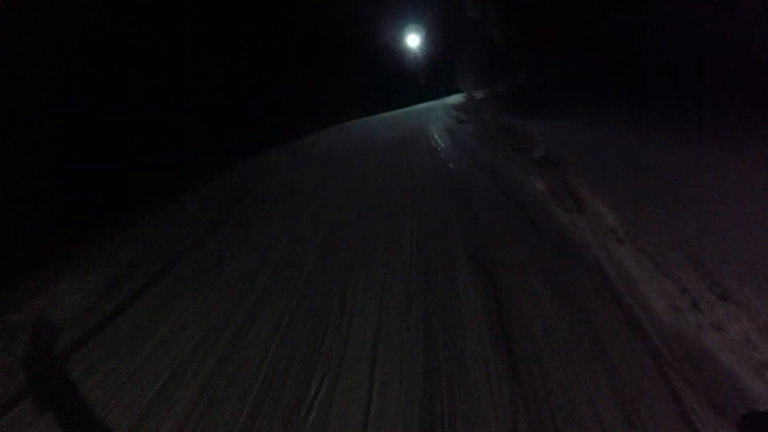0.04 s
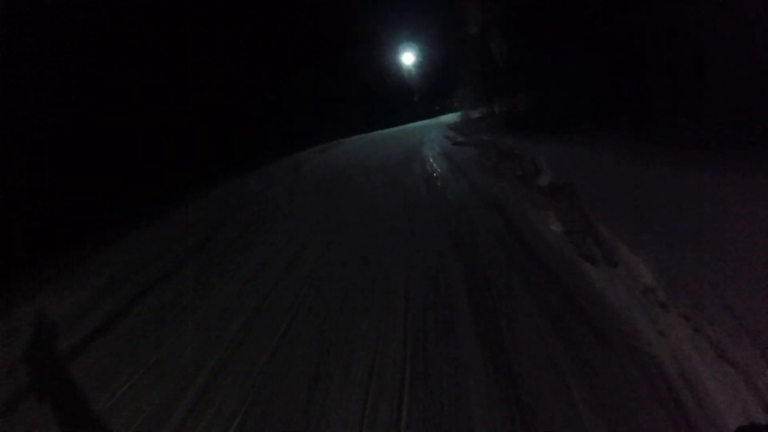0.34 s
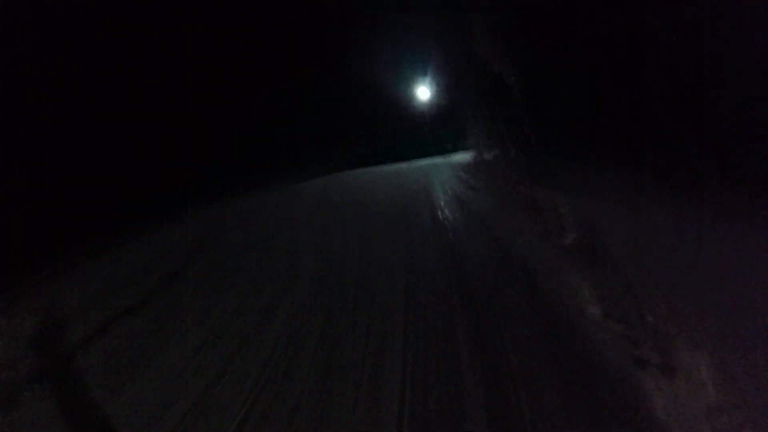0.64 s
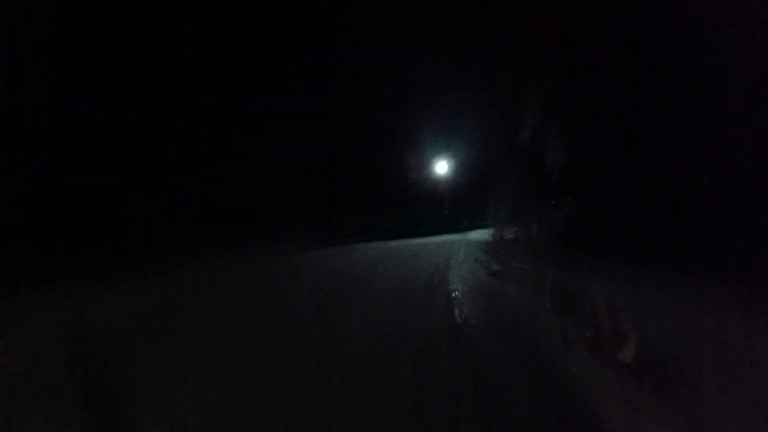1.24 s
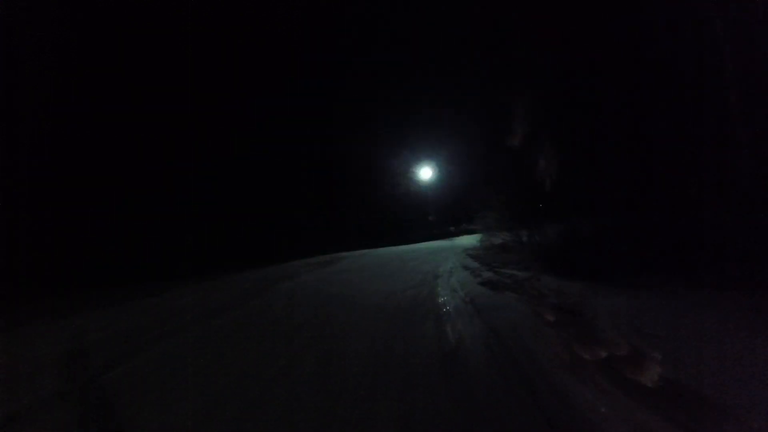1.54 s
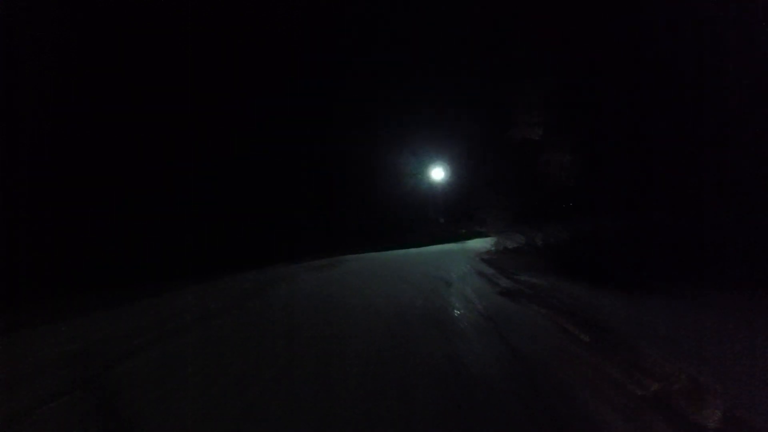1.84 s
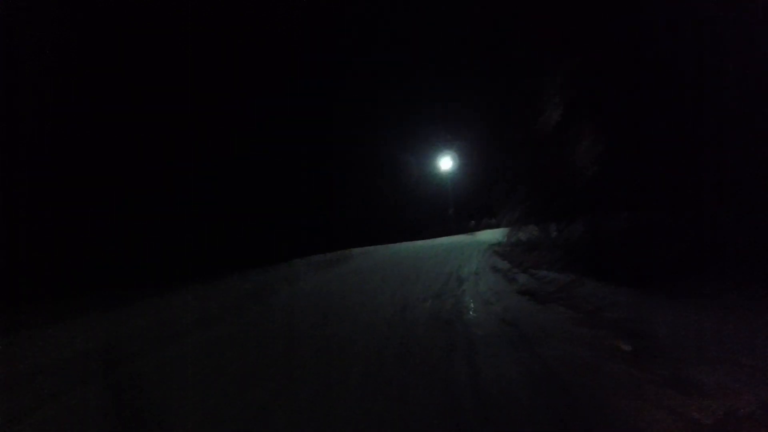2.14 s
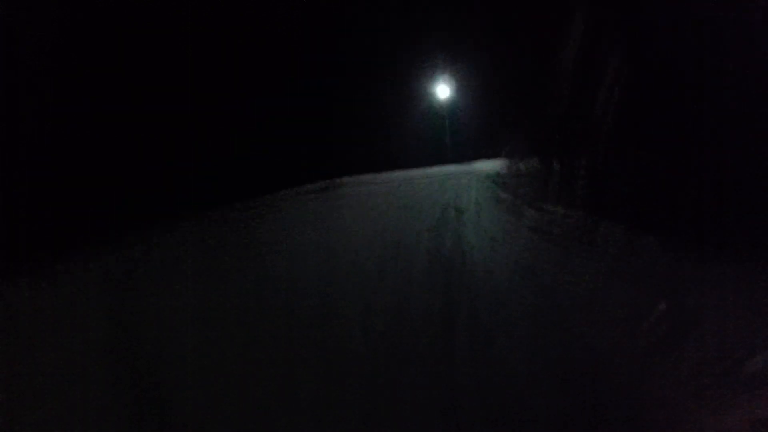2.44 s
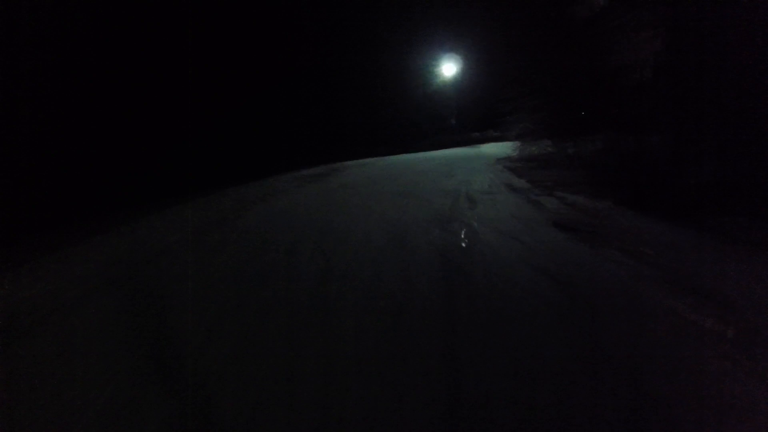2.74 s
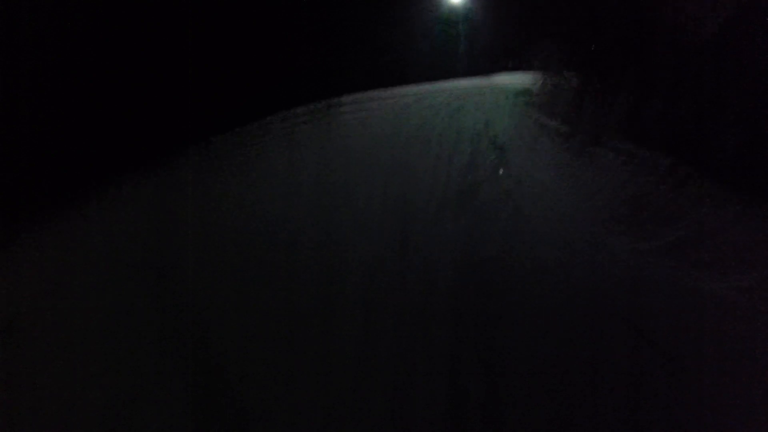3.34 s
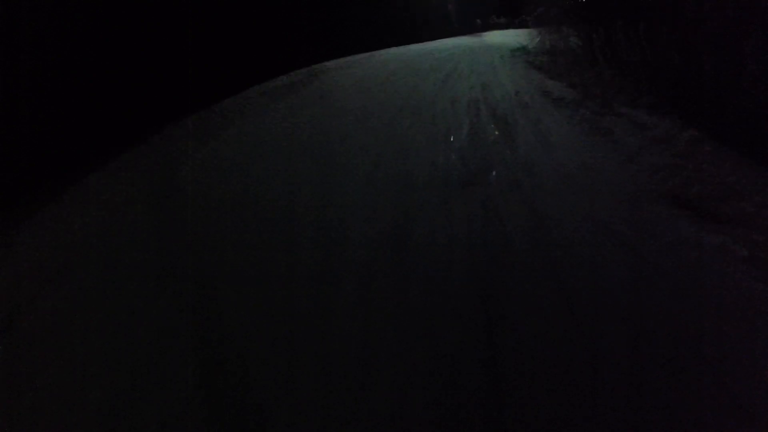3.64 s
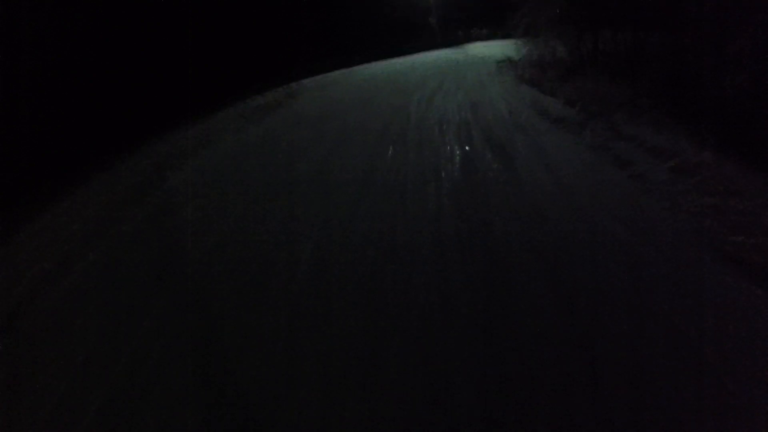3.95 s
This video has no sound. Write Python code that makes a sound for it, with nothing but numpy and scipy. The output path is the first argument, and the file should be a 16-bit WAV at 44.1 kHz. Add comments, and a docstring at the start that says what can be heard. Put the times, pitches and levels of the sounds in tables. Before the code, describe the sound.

Rasping rub against the microphone ends with a bump, leaving soft ski hiss and rumble.

```python
"""On a groomed ski slope at night, heard from inside the housing of a camera worn by a skier.
Something, probably a glove, scrapes the housing by stick-slip friction, lifts off and knocks the mount
into free vibration. Then the skis glide with a faint hiss and light edge scuffs as snow crystals
excite their resonances, while bumps shake the mount and make the housing rub and tick."""
import sys
import numpy as np
from scipy.fft import rfft, irfft, next_fast_len
from scipy.io import wavfile
from scipy.ndimage import map_coordinates

SR = 44100
rng = np.random.default_rng(int(sys.argv[2]) if len(sys.argv) > 2 else 0)


def wrap_up_sound(samples):
    """Save the sound to the file named by the first command line argument, as 16-bit audio."""
    columns = np.atleast_2d(samples).T
    # keep every value between -1 and 1, then stretch to whole-number steps
    tamed = np.clip(columns, -1, 1)
    steps = np.round(tamed * 32767).astype(np.int16)
    wavfile.write(sys.argv[1], SR, steps)


N = 176400

CRYSTALS_PER_S, CRYSTAL_SPREAD_DB = 2500, 4.5
# excitation spectrum of a soft contact: frequency_hz, level_db
SOFT_CONTACT = [(700, 1), (1400, 4.5), (6000, -2.5), (12000, -19)]


def amp(db):
    """Amplitude ratio of a level in decibels."""
    return 10 ** (np.asarray(db) / 20)


def unit(x):
    """Normalisation to rms 1."""
    return x / np.sqrt(np.mean(x ** 2) + 1e-20)


def clock():
    """The time of each sample in seconds."""
    return np.arange(N) / SR


def curves(rows):
    """Linear interpolation in time: one curve for each column after the first."""
    times, *columns = np.transpose(rows)
    return [np.interp(clock(), times, column) for column in columns]


def wobble(knots_per_s):
    """Smooth random modulation: a spline through Gaussian values."""
    return map_coordinates(rng.standard_normal(N // 20), [clock() * knots_per_s], mode="wrap")


def impulse(time_s):
    """A unit impulse, the ideal brief blow."""
    return (np.arange(N) == round(time_s * SR)) * 1.0


def slips(per_s, spread_db):
    """Friction as shot noise: random impulses of log-normal size, at rms 1."""
    signed_impulses = (rng.random(N) < per_s / SR) * np.sign(rng.standard_normal(N))
    return unit(signed_impulses * amp(spread_db * rng.standard_normal(N)))


def filtered(x, response):
    """Linear filtering: the spectrum of x times a frequency response."""
    size = next_fast_len(N + SR // 2)
    return irfft(rfft(x, size) * response(np.fft.rfftfreq(size, 1 / SR)), size)[:N]


def gain_at(f, points):
    """Gain at f, interpolated between (Hz, dB) points on a log frequency axis."""
    hz, db = np.transpose(points)
    return amp(np.interp(np.log(f + 1), np.log(hz + 1), db))


def coloured(x, points):
    """Zero-phase spectral shaping by (Hz, dB) points, at rms 1."""
    return unit(filtered(x, lambda f: gain_at(f, points)))


def resonate(x, modes):
    """Modal superposition: x drives damped resonators in parallel, at rms 1."""
    def response(f):
        return sum(amp(db) * 1j * f * width / (hz * hz - f * f + 1j * f * width)
                   for hz, width, db in modes)
    return unit(filtered(x, response))


def struck(x, points):
    """Minimum-phase response to x of a body given by (Hz, dB) points, at peak 1."""
    size = 2 * next_fast_len(N // 2 + SR // 4)
    cepstrum = irfft(np.log(gain_at(np.fft.rfftfreq(size, 1 / SR), points)), size)
    cepstrum[1:size // 2] *= 2  # folding onto positive time makes the response causal
    cepstrum[size // 2 + 1:] = 0
    ring = irfft(rfft(x, size) * np.exp(rfft(cepstrum)), size)[:N]
    return ring / np.abs(ring).max()


def scrape():
    """Stick-slip friction excites the housing; the contact grows lighter and thinner, then lifts off."""
    # band envelopes before trim: time_s, ring_db, rasp_db, treble_db
    band_levels = [(0.0, -32, -32, -46), (0.032, -41, -52, -60.5), (0.08, -43, -45, -57.5),
                   (0.12, -34, -38.5, -47.5), (0.14, -35, -38, -48.5), (0.2, -35.5, -38, -47.5),
                   (0.25, -43, -46.5, -57.5), (0.3, -34.5, -42, -52.5), (0.334, -37, -40.5, -51.5),
                   (0.378, -43.5, -49, -49), (0.412, -50, -54.5, -58.5), (0.45, -42.5, -54, -51.5),
                   (0.478, -46, -52, -52.5), (0.53, -40.5, -44, -46), (0.572, -43.5, -43.5, -49)]
    # spectrum under firm contact: frequency_hz, level_db
    firm_spectrum = [(150, -14), (400, -25.5), (650, -28.5), (1100, -23.5), (1550, -11.5), (1870, -9.5),
                     (2080, 4.5), (2260, -7.5), (2420, -0.5), (2650, -4.5), (2900, -16.5), (3130, -9.5),
                     (3430, -12.5), (3750, -9.5), (4030, -7.5), (4280, -22), (4750, -19.5), (5350, -29.5),
                     (5900, -20), (6400, -14), (6850, -20), (7250, -23), (7700, -24.5), (8500, -32),
                     (9100, -41), (10500, -37), (11000, -42), (11550, -35.5), (12400, -42), (15000, -46)]
    # spectrum under light contact: frequency_hz, level_db
    light_spectrum = [(150, -10.5), (750, -29), (1200, -21.5), (1600, -10.5), (1850, -13.5), (2100, -1),
                      (2470, -2), (2750, -5), (2930, -14), (3150, -5), (3450, -12.5), (3950, -3),
                      (4350, -15.5), (4750, -12), (5300, -25), (5900, -9.5), (6400, -1.5), (6800, -10.5),
                      (7200, -17), (7650, -13), (8100, -21), (8500, -17.5), (9100, -31), (10900, -32.5),
                      (11700, -25), (12500, -33), (15000, -35)]
    # ring, rasp and treble: low_hz, high_hz, trim_db
    bands = [(0, 2900, 0.7), (2900, 5400, 1), (5400, SR, -0.4)]
    ease_s, ease_fade_s, lift_s, lift_fade_s = 0.368, 0.04, 0.579, 0.01
    t, out = clock(), np.zeros(N)
    friction = slips(per_s=8000, spread_db=1.8) * amp(0.5 * wobble(knots_per_s=160))  # with judder
    firm, light = coloured(friction, firm_spectrum), coloured(friction, light_spectrum)
    eased = np.clip((t - ease_s) / ease_fade_s + .5, 0, 1)
    for level_db, (low_hz, high_hz, trim_db) in zip(curves(band_levels), bands):
        band = lambda x: unit(filtered(x, lambda f: (f >= low_hz) & (f < high_hz)))
        out += amp(level_db + trim_db) * ((1 - eased) * band(firm) + eased * band(light))
    touching = np.clip((lift_s - t) / lift_fade_s + .5, 0, 1)
    return out * touching


def knock():
    """Impulse response: one blow clicks on the housing, then the mount gives and its low modes ring."""
    # housing response to hard contact: frequency_hz, gain_db
    click_response = [(300, -14), (1100, -21), (1290, 0), (1440, -14), (1570, 4.5), (1750, -5), (2000, 3.5),
                      (2300, 2.5), (2780, -19), (3050, -0.5), (3650, -21), (4700, -20), (15000, -54)]
    # mount response: frequency_hz, gain_db
    mount_response = [(15, -34), (55, -16), (73, 4), (100, -5.5), (130, -0.5), (160, 0.5), (187, -14.5),
                      (230, -12.5), (290, -4.5), (330, -9), (390, -30.5), (470, -44), (600, -27.5),
                      (740, -44), (1200, -52), (4000, -100)]
    click = amp(-25) * struck(impulse(time_s=0.6653), click_response)
    thump = amp(-16.5) * struck(impulse(time_s=0.667), mount_response)
    return click - thump


def rubs():
    """Resonance under friction: soft swells of rubbing ring the housing and make the mount groan."""
    # housing modes: frequency_hz, bandwidth_hz, gain_db
    housing_modes = [(1580, 72, 13), (2137, 200, 15.5), (2370, 92, 11), (3100, 180, -28), (4700, 300, -32),
                     (6200, 600, -36)]
    # creaking mode of the mount: frequency_hz, bandwidth_hz, gain_db
    groan_mode = [(284.4, 78, 0)]
    # soft rubs: peak_s, rise_s, fall_s, ring_db, groan_db
    strokes = [(.004, .02, 0.02, -41, -63), (.585, 0.009, 0.026, -55.5, -65),
               (.641, 0.025, 0.03, -46.5, -48.5), (.775, 0.072, 0.039, -60.5, -72),
               (.826, 0.023, 0.035, -59.5, -59.5), (.93, 0.064, 0.049, -70, -63),
               (1.309, 0.034, 0.018, -62, -51), (1.334, 0.0065, 0.0095, -59, -49)]
    t, out = clock(), np.zeros(N)
    ring = coloured(resonate(slips(per_s=3000, spread_db=0.5), housing_modes), SOFT_CONTACT)
    groan = resonate(resonate(rng.standard_normal(N), groan_mode), groan_mode)
    for peak_s, rise_s, fall_s, ring_db, groan_db in strokes:
        swell = np.exp(-((t - peak_s) / np.where(t < peak_s, rise_s, fall_s)) ** 2)
        out += swell * (amp(ring_db) * ring + amp(groan_db) * groan)
    return out


def ticks():
    """Transient excitation: gritty contacts tick on the housing, each at its own level and brightness."""
    # contacts: start_s, peak_db, excitation_centre_hz
    contacts = [(.131, -24.5, 4500), (0.53, -34, 4000), (2.4724, -46.5, 4000), (3.109, -51, 3400),
                (3.5897, -46, 1400), (3.968, -50, 1700)]
    # response of the plastic: frequency_hz, gain_db
    plastic_response = [(300, -16), (1000, -17), (1500, -7), (2050, 4), (2750, -6), (3300, -3), (4100, -1),
                        (5400, -15.5), (6200, -7), (15000, -38)]
    t60_s, octave_loss_db = 0.015, 5.5  # the loss applies one octave from the centre
    out = np.zeros(N)
    for start_s, peak_db, centre_hz in contacts:
        age = clock() - start_s
        grit = rng.standard_normal(N) * (age >= 0) * amp(-60 * np.abs(age) / t60_s)
        response = [(hz, db - octave_loss_db * np.log2(hz / centre_hz) ** 2)
                    for hz, db in plastic_response]
        out += amp(peak_db) * struck(grit, response)
    return out


def rumble():
    """Forced vibration: bumps in the snow and airflow shake the mount around its lowest resonance."""
    # shaking under the scrape: time_s, level_db
    scrape_shake = [(0.0, -54), (0.02, -48.5), (0.14, -41), (0.206, -53), (0.3, -44), (0.478, -60.5),
                    (0.552, -42), (0.62, -54)]
    # shaking from the slope: time_s, level_db
    slope_shake = [(0.74, -51), (0.77, -57), (0.92, -48.5), (1.04, -62), (1.15, -52), (1.26, -63),
                   (1.29, -50.5), (1.37, -47), (1.48, -66.5), (1.57, -54.5), (1.62, -67), (1.84, -61.5),
                   (2.01, -65), (2.43, -59), (2.47, -52.5), (2.52, -56), (2.68, -66.5), (2.72, -62),
                   (3.02, -69), (3.05, -64.5), (3.65, -61), (3.68, -57), (3.75, -64.5), (3.89, -56.5),
                   (3.94, -66), (3.97, -59)]
    # spectrum of the shaken mount: frequency_hz, level_db
    shake_spectrum = [(8, -4), (20, -1.5), (45, -6), (60, -1.5), (73, 4), (86, -2.5), (105, -11),
                      (168, -12), (200, -16.5), (320, -26), (600, -50), (1500, -82)]
    trim_db = 0.5
    level_db, = curves(np.vstack([scrape_shake, slope_shake]))
    return amp(level_db + trim_db) * coloured(rng.standard_normal(N), shake_spectrum)


def glide():
    """Random impact excitation: snow crystals ring the skis, heard through the housing."""
    # envelope of the skis on snow: time_s, level_db
    glide_levels = [(0.7, -62), (0.96, -62.5), (1.25, -65), (1.75, -65.5), (2.4, -63.5), (4.0, -64.5)]
    # ski modes: frequency_hz, bandwidth_hz, gain_db
    ski_modes = [(1513, 124, 6), (2510, 280, 3.5), (2930, 180, -6.5), (3810, 200, -15), (5900, 310, -29)]
    trim_db = -3.5
    level_db, = curves(glide_levels)
    ring = resonate(slips(CRYSTALS_PER_S, CRYSTAL_SPREAD_DB), ski_modes)
    return ring * amp(level_db + trim_db + 0.65 * wobble(knots_per_s=25.1))


def scuffs():
    """Modal excitation: now and then an edge bites, and crystals ring the ski's upper resonances."""
    # edge bites: peak_s, half_length_s, level_db
    bites = [(0.823, 0.018, -64), (1.33, .018, -64), (1.46, 0.047, -67), (2.14, 0.063, -65.5),
             (2.59, 0.046, -67), (2.67, .014, -61.5), (3.108, .014, -62), (3.68, .025, -66),
             (3.972, .018, -64.5)]
    # modes excited at the edge: frequency_hz, bandwidth_hz, gain_db
    edge_modes = [(2460, 330, 0), (2980, 300, -14)]
    swells = sum(amp(db) * np.exp(-((clock() - peak_s) / half_s) ** 2) for peak_s, half_s, db in bites)
    ring = resonate(slips(CRYSTALS_PER_S, CRYSTAL_SPREAD_DB), edge_modes)
    return swells * coloured(ring, SOFT_CONTACT)


def air():
    """Broadband noise: the air makes a faint, nearly even hiss."""
    # spectrum of the hiss: frequency_hz, level_db
    hiss_spectrum = [(120, -2), (200, 1), (344, -1.5), (647, -3), (963, -5.5), (1510, -7.5), (1780, -6),
                     (2420, -5.5), (2800, -16), (3120, -12), (5360, -17), (6190, -15.5), (7280, -20.5),
                     (10100, -25.5), (15000, -39)]
    return coloured(rng.standard_normal(N), hiss_spectrum) * amp(-63 + 0.29 * wobble(knots_per_s=8.1))


def scene():
    """Superposition: all sources add at the one microphone in the housing."""
    return (scrape() + rubs() + knock() + ticks() + rumble() + glide() + air() + scuffs())[None]


def record(dry):
    """Band limiting: the camera passes nothing above its cutoff."""
    cutoff_hz = 15150
    return np.array([filtered(dry[0], lambda hz: hz < cutoff_hz)])


dry = scene()
out = record(dry)
wrap_up_sound(out)
```